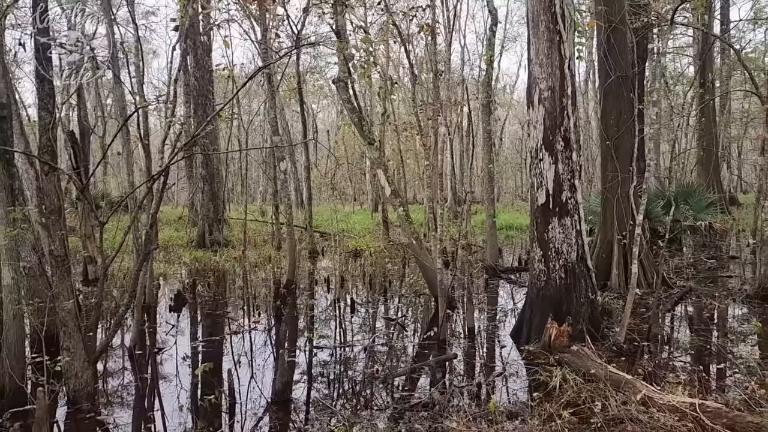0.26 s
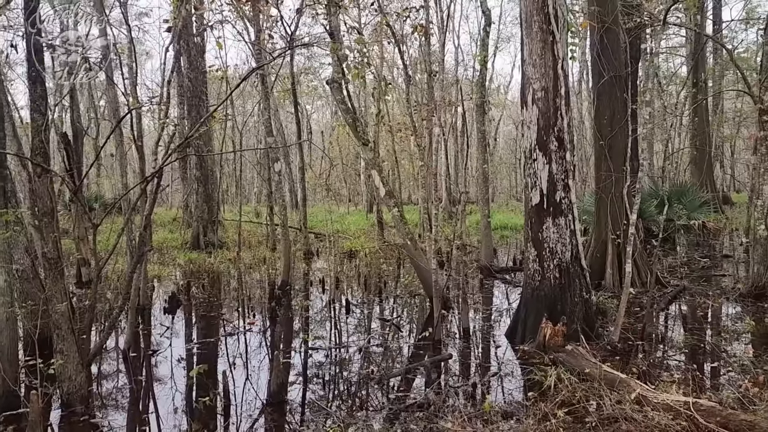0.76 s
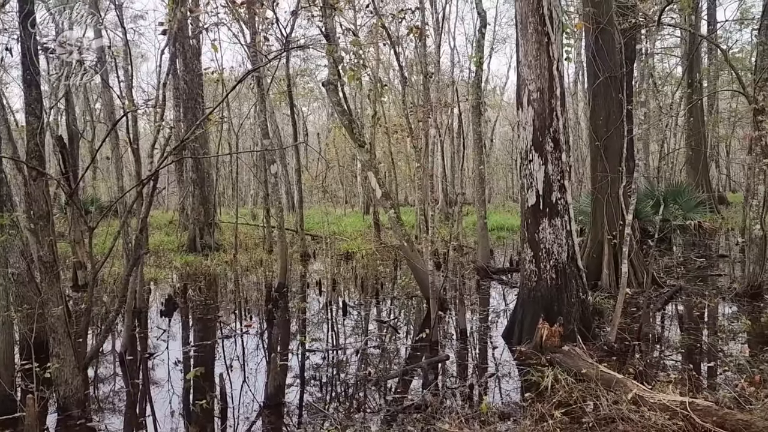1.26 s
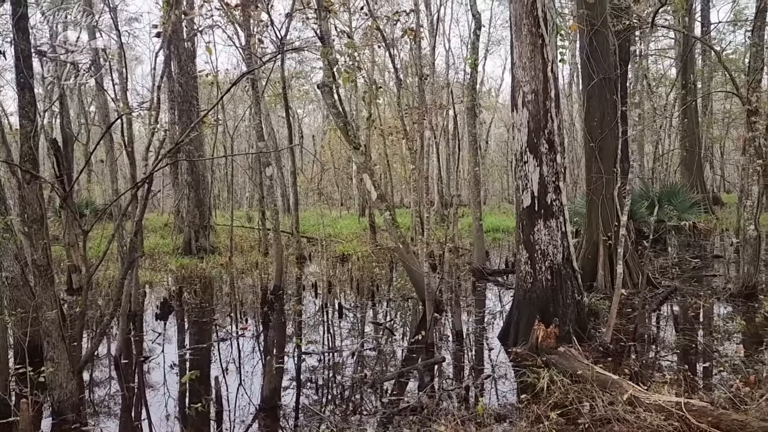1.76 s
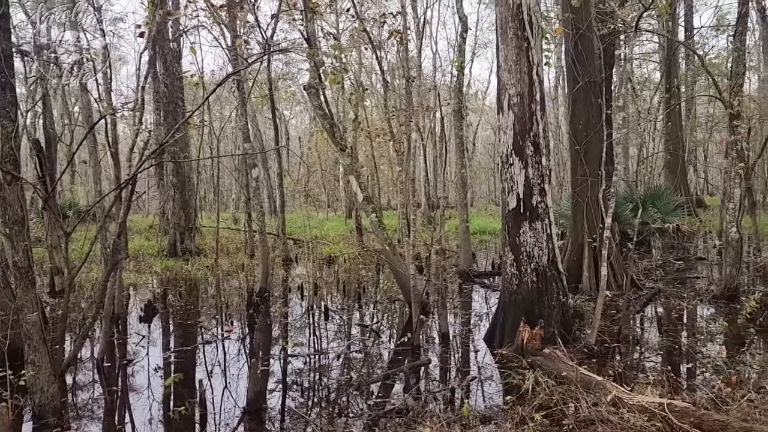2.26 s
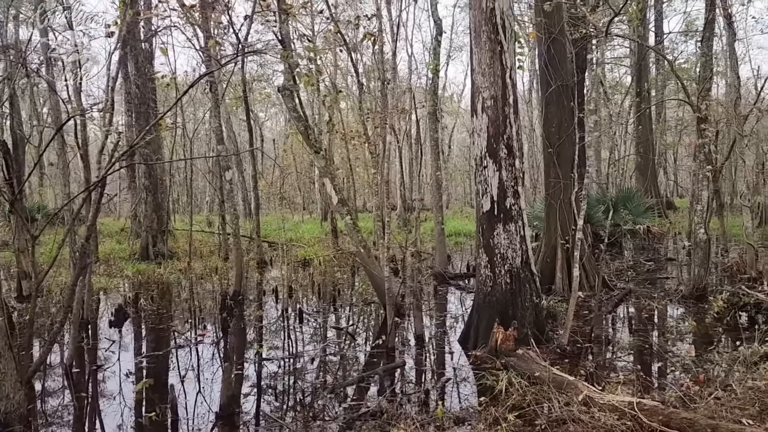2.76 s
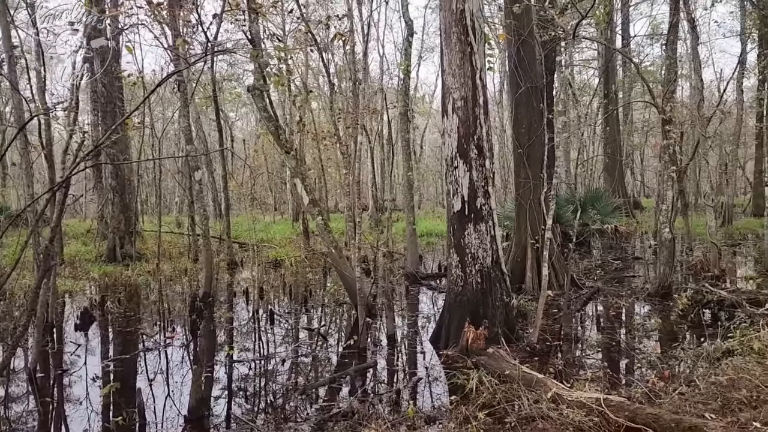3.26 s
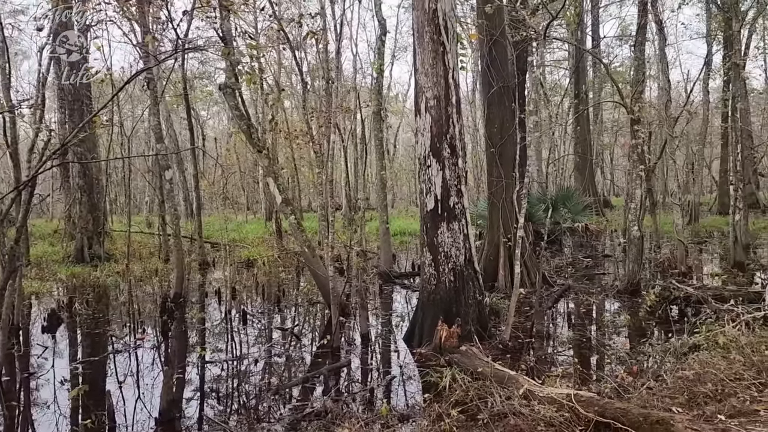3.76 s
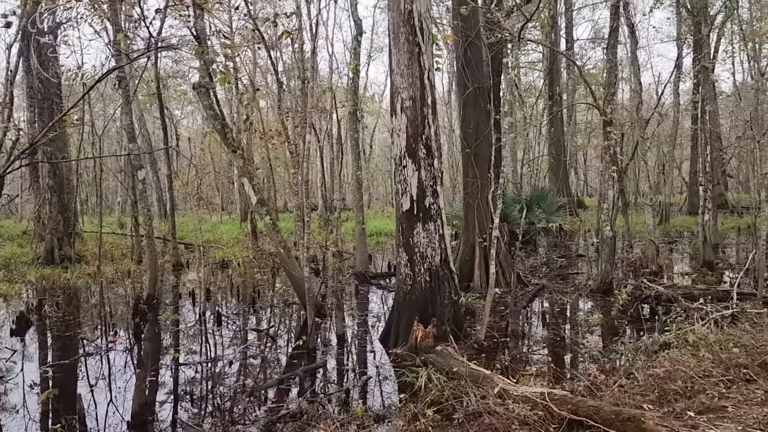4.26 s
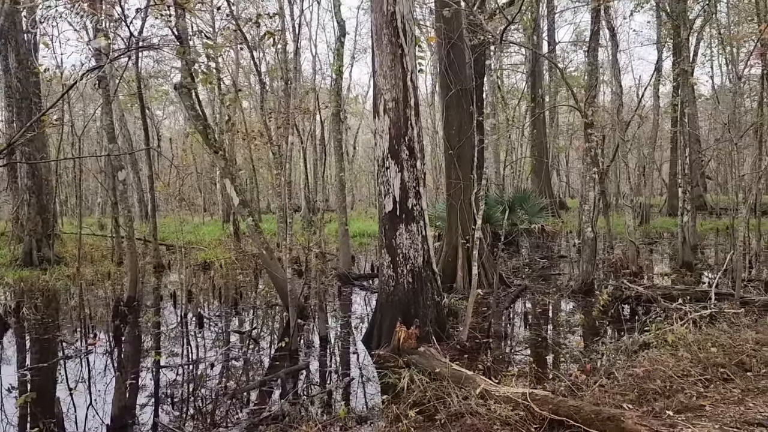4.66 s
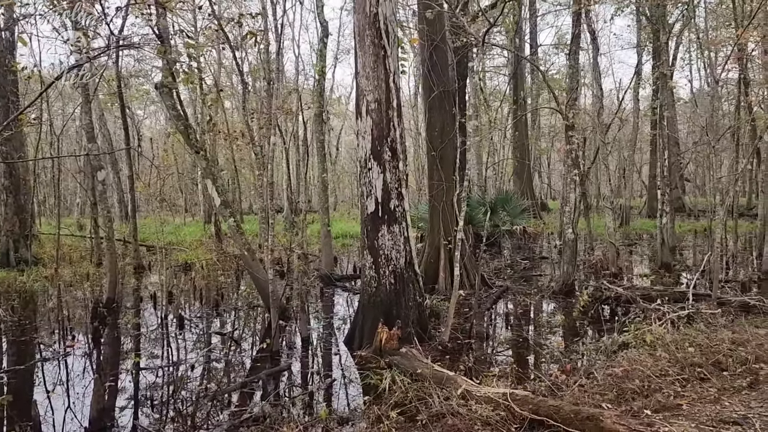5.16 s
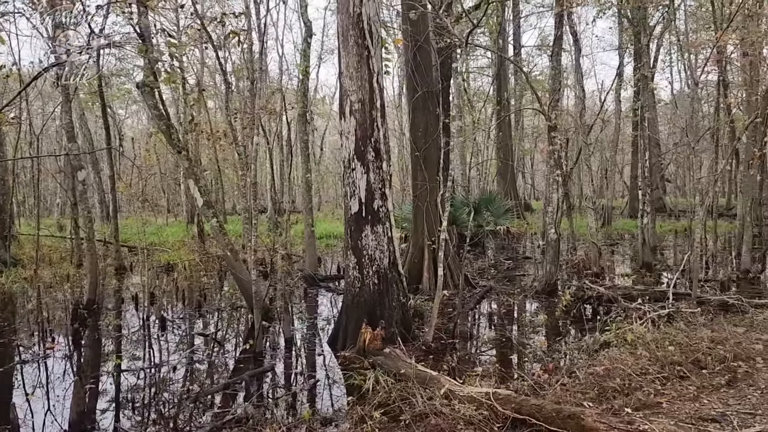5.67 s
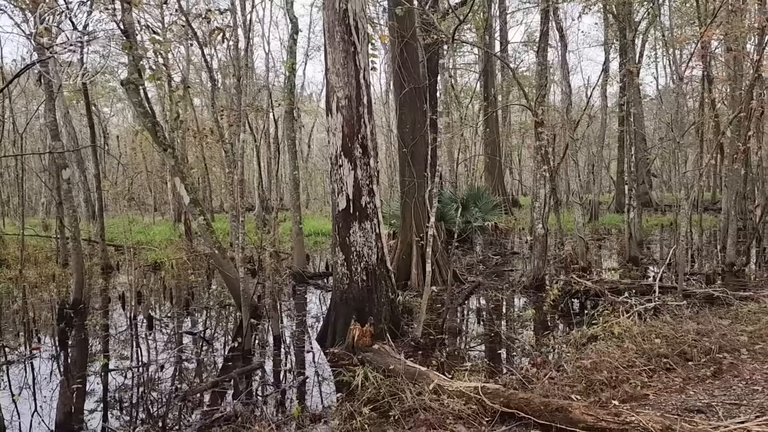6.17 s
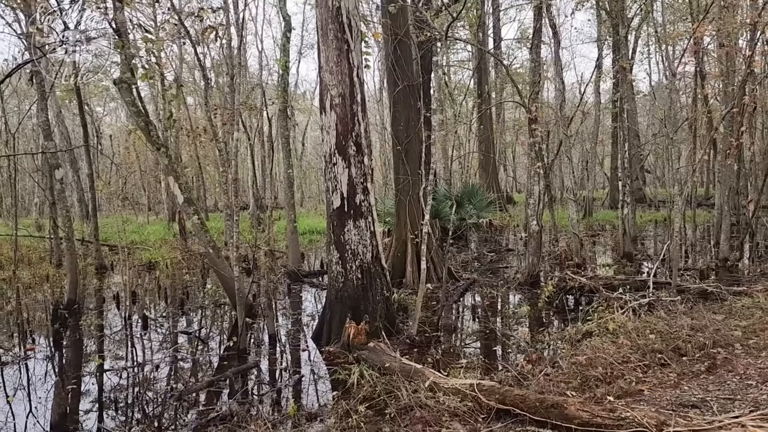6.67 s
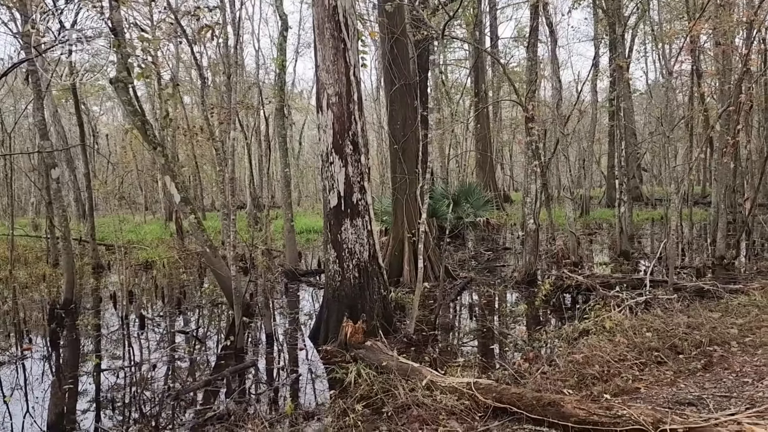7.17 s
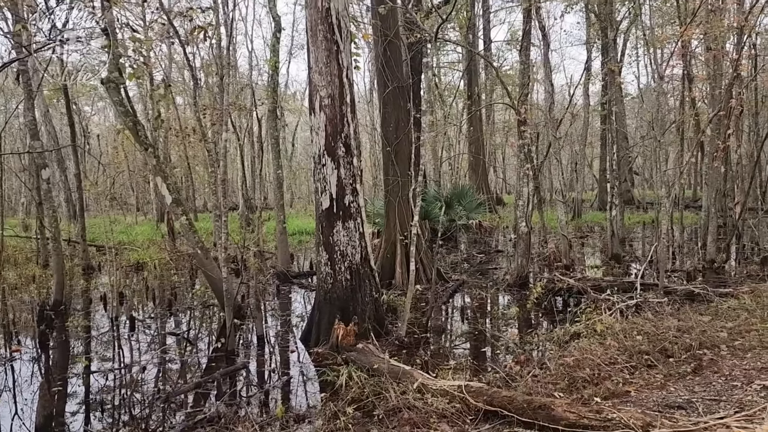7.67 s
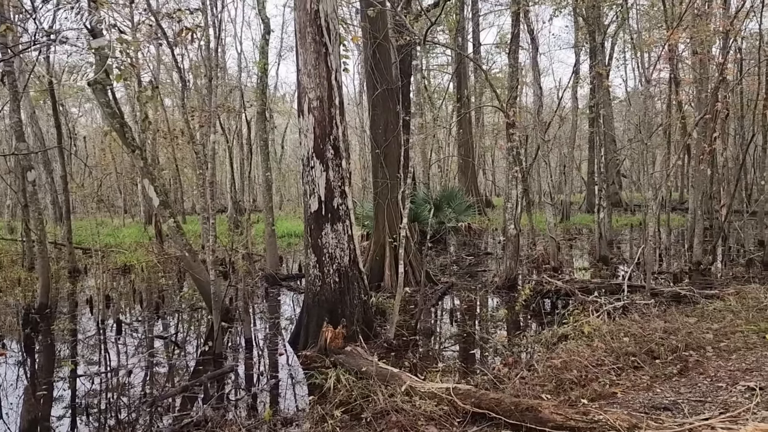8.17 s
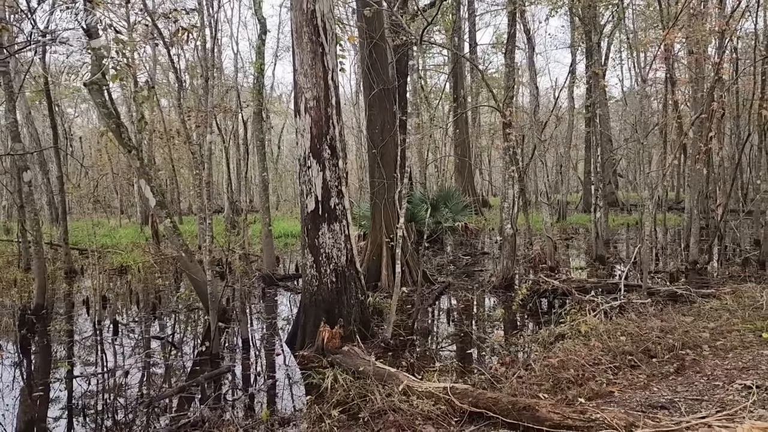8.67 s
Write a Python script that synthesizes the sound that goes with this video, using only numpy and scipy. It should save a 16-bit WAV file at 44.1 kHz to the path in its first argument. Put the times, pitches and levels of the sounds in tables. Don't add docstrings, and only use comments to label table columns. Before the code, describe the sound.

A still, wet woodland heard in wide stereo from a handheld microphone. Throughout, insects hold a thin, high, slightly shimmering drone, stronger on the right, over soft low traffic rumble. From 0 to 1 s birds sing a twice-repeated whistled phrase with low whistles and high chips, echoes ringing off trunks and water. From 1 to 4 s it is sparser: high chips, a bright one at 2.1, short harsh scolds, small rustles and a dull bump near 3.4. A faint distant engine hum grows from about 4 s. The whistled phrase returns four times from 4.2 to 5.6 s, followed by sharp chips and ticks to 6.5. Around 6.9 a broad airy wash sets in. From 7.1 a bird rattles in accelerating beats to the end; handling clicks, case knocks and thumps cluster at 7.2 to 7.5, lighter ones until 8.1. A loud piercing chip comes at 8.5.

```python
import sys
import numpy as np
from scipy import signal
from scipy.io import wavfile
from scipy.ndimage import uniform_filter1d

SR = 44100
rng = np.random.default_rng(int(sys.argv[2]) if len(sys.argv) > 2 else 0)


def voltage_ratio(level):
    return 10 ** (np.asarray(level, float) / 20)


def transcribe(u):
    v = np.clip(np.atleast_2d(u).T, -1, 1)
    q = np.round(v * 32767).astype(np.int16)
    wavfile.write(sys.argv[1], SR, q)


N = 393372


def evened(x):
    return x / np.sqrt(np.mean(x ** 2) + 1e-20)


def read(points, hz):
    f, value = np.transpose(points)
    return np.interp(np.log(hz + 1), np.log(f + 1), value)


def curve(rows, column=1):
    rows = np.array(rows)
    after = -140 if rows[-1, 0] < 8.8 else None
    return np.interp(np.arange(N) / SR, rows[:, 0], rows[:, column], left=-140, right=after)


def add(mix, s, sound, pan_db):
    for side, sign in zip(mix, (1, -1)):
        start = max(round(s * SR + sign * 0.2 * pan_db), 0)
        part = side[start:][:len(sound)]
        part += sound[:len(part)] * voltage_ratio(sign * pan_db / 2)


def band_pass(x, low_hz, high_hz):
    return signal.sosfilt(signal.butter(2, [low_hz, high_hz], "band", fs=SR, output="sos"), x)


def resonate(x, hz, width):
    turn = np.exp(2j * np.pi * hz * np.arange(x.shape[-1]) / SR)
    r = np.exp(-np.pi * width / SR)
    return 2 * (turn * signal.lfilter([1 - r], [1, -r], x / turn)).real


def resonate_twice(x, hz, width, second=1):
    return evened(resonate(resonate(x, hz, width), hz, second * width))


def air(spectrum, same, patchy_db, lean=((1, 0), (2, 0))):
    frames, hz = N // 512 + 5, np.fft.rfftfreq(2048, 1 / SR)
    a, b, c, d, patches = rng.standard_normal((frames, 1025, 5)).T
    patches = uniform_filter1d(patches, size=14, axis=0)
    patches = evened(uniform_filter1d(patches, size=8, axis=1))
    like = np.clip(read(same, hz), -1, 1)[:, None]
    left = a + 1j * b
    right = like * left + np.sqrt(1 - like ** 2) * (c + 1j * d)
    z = np.array([left, right]) * voltage_ratio(read(spectrum, hz)[:, None] + patchy_db * patches)
    z *= voltage_ratio(np.outer([0.5, -0.5], read(lean, hz)))[:, :, None]
    return evened(signal.istft(z, nperseg=2048, noverlap=1536)[1][:, :N])


# f/Hz, likeness (1 the same, below 0 opposed)
SAME = [(25, 0.87), (60, 1), (240, 0.86), (950, -0.19), (3770, 0.27), (15000, -0.2)]


def still_air():
    # f/Hz, level/dB
    rumble = [(18, -23), (35, -15), (55, 1.5), (71, 0.5), (110, -5.5), (165, -18), (270, -18.5), (400, -31),
              (520, -57.5)]
    # f/Hz, level/dB
    still = [(300, 2.5), (600, 6), (1600, 4.5), (2600, 5), (3400, 2), (6200, 8), (8000, 6), (8700, 2),
             (9300, 6), (10300, 4.5), (11000, -5.5), (15800, -9)]
    # f/Hz, left-right level/dB
    lean = [(150, 15), (380, 2.5), (950, -0.5), (2380, -4.5), (5980, -15.5), (8700, 9), (10200, 0.5),
            (11500, 11)]
    traffic = voltage_ratio(-45.5) * air(rumble, SAME, patchy_db=1.5)
    return traffic + voltage_ratio(-58.5) * air(still, SAME, patchy_db=1.45, lean=lean)


def moving_air():
    # f/Hz, level/dB
    wash = [(15, -34), (25, -8), (102, -10), (387, -19.5), (780, -15.5), (985, -23), (1440, -13),
            (1820, -23), (2160, -16.5), (2910, -27), (4000, -28), (5200, -34), (8800, -120)]
    # f/Hz, likeness
    same_wash = [(60, 0.95), (240, 0.86), (950, 0.52), (3770, 0.01), (15000, 0.11)]
    # t/s, hiss level/dB, gust level/dB
    wash_db = [
        (6.905, -51.5, -39),
        (7.6, -48.5, -39),
        (8.92, -49.5, -37.5),
    ]
    high_pass = signal.butter(2, 250, "high", fs=SR, output="sos")
    hiss = evened(signal.sosfilt(high_pass, air(wash, same_wash, patchy_db=1.5)))
    gust_spectrum = [(15, -25), (35, -0.5), (80, 2.5), (150, -10.5), (260, -21.0), (500, -51.0)]
    gusts = air(gust_spectrum, same_wash, patchy_db=1.5)
    return voltage_ratio(curve(wash_db)) * hiss + voltage_ratio(curve(wash_db, column=2)) * gusts


def engines():
    # t/s, f/Hz, level/dB
    hum = [(2.8, 134, -70), (3.9, 136, -55), (4.2, 137, -49.5), (6.3, 138.5, -44.5), (7.0, 138, -44),
           (7.15, 138, -56), (8.2, 138, -47), (8.4, 138, -62)]
    # t/s, f/Hz, level/dB
    high_hum = [(0.0, 260.7, -63), (2.48, 259.9, -64), (2.6, 252, -79)]
    out = 0
    for rows in (hum, high_hum):
        flutter = 1 + 0.12 * evened(uniform_filter1d(rng.standard_normal(N), size=3000))
        hz = np.maximum(curve(rows), 0)
        level = np.sqrt(2) * voltage_ratio(curve(rows, column=2))
        out = out + level * flutter * np.sin(2 * np.pi * np.cumsum(hz) / SR)
    return out


def insects(depth=0.2):
    # wing f/Hz, width/Hz, pulse rate/Hz, level/dB
    voices = [(4406, 400, 37, -3), (4735, 290, 53, 1), (4985, 305, 100, 1.5), (5200, 290, 67, -1),
              (5299, 157, 100, -1), (5440, 230, 73, -3.5)]
    # t/s, level/dB
    chorus_db = [(0.0, -41.5), (6.83, -41.5), (8.92, -40.5)]
    out = np.zeros((2, N))
    for hz, width, rate, db in voices:
        drift = evened(uniform_filter1d(rng.standard_normal((2, N)), size=6000))
        turns = np.cumsum(rate * (1 + 0.12 * drift), axis=1) / SR
        pulses = (1 + depth * np.cos(2 * np.pi * turns)) ** 2
        scrape = rng.standard_normal((2, N)) * pulses
        out += voltage_ratio(db) * resonate_twice(scrape, hz, width, second=1.08)
    side_db = np.array([[-1.5], [4.5]])
    return voltage_ratio(curve(chorus_db) + side_db) * evened(out)


def far_song():
    # t/s, low voices level/dB, high voices level/dB
    far_birds = [(0, -49, -45), (1.1, -53, -57.5), (2, -65, -78), (3, -86, -54), (3.9, -62.5, -70),
                 (4.9, -47, -59), (6.2, -54, -61), (7.2, -60.5, -54.5), (8.92, -50, -52)]
    low = air([(1700, -15), (2200, 0.5), (3000, -1), (3900, -2), (4400, -52)], SAME, patchy_db=3)
    high = air([(5600, -40), (6300, 0), (7500, 0), (8300, -4), (8700, -40)], SAME, patchy_db=4)
    return voltage_ratio(curve(far_birds)) * low + voltage_ratio(curve(far_birds, column=2)) * high


def knocks():
    # t/s, tick level/dB, thump level/dB, body level/dB, left-right level/dB
    hits = [(3.16, -94, -43, -81, 1), (3.419, -70, -36.5, -72, 1), (7.188, -54, -44.5, -57, 27.5),
            (7.2545, -47, -55, -49, 12), (7.266, -41, -44, -52, 21), (7.311, -34, -63, -34.5, -24),
            (7.3282, -28.5, -60, -27.5, -25), (7.435, -29, -52.5, -47, -15),
            (7.4457, -20.5, -29.5, -31.5, -16.5), (7.478, -21.5, -51, -39, -10.5),
            (7.719, -40, -43.5, -50, 13.5), (7.756, -29.5, -58, -59, 14), (8.011, -38, -37.5, -44.5, 20),
            (8.056, -41, -43.5, -55, 15)]
    # f/Hz, level/dB, time to fade by 60 dB/s
    case = ((312, -15.5, 0.052), (512, -8.5, 0.035), (820, 4.5, 0.0046), (1710, -3.0, 0.006))
    out, t = np.zeros((2, N)), np.arange(2600) / SR
    for s, tick_db, thump_db, body_db, pan_db in hits:
        grit, pitch = rng.standard_normal(len(t)), rng.uniform(0.84, 1.195)
        tick = voltage_ratio(tick_db - 60 * t / 0.0041) * band_pass(grit, 2500, 10500)
        body = 0
        for hz, db, t60 in case:
            body = body + voltage_ratio(db - 60 * t / t60) * np.sin(2 * np.pi * hz * pitch * t - 0.9)
        body = body * (1 - np.exp(-t / 0.000089))
        sag_hz = 75 + 130 * np.exp(-t / 0.006)
        thump = np.sin(2 * np.pi * np.cumsum(sag_hz) / SR - 1.5)
        thump = thump * voltage_ratio(-60 * t / 0.098) * (1 - np.exp(-t / 0.0017))
        add(out, s, tick - voltage_ratio(body_db + 5.5) * body + voltage_ratio(thump_db + 6.0) * thump, pan_db)
    return out


def rustles():
    # t/s, length/s, centre f/Hz,
    # width/Hz, level/dB
    puffs = [(0.228, .04, 2000, 1700, -58), (0.85, 0.12, 3200, 2400, -49.5),
             (2.967, 0.042, 410, 151, -53.5), (3.229, 0.069, 3300, 1600, -47),
             (3.255, 0.056, 2400, 2200, -44), (3.255, 0.06, 6800, 1800, -49.5),
             (4.067, 0.043, 3200, 1510, -56.5), (4.305, 0.075, 800, 3300, -50),
             (4.319, 0.039, 210, 72, -41.5), (4.611, 0.1, 393, 89, -56.5), (4.925, 0.036, 430, 440, -52.5),
             (5.33, 0.27, 1280, 500, -60.5), (5.35, .06, 1550, 150, -53.5), (5.4, 0.055, 1660, 210, -57),
             (5.801, 0.056, 1760, 900, -56), (3.87, .11, 1250, 200, -62), (4.02, .11, 600, 150, -65),
             (6.54, .12, 1220, 50, -65), (4.52, .18, 1450, 300, -64), (3.3, .1, 2800, 1200, -59),
             (3.14, .05, 200, 50, -47), (3.8, 0.039, 520, 250, -62), (5.23, 0.038, 730, 500, -61.5),
             (5.79, 0.059, 460, 140, -59), (6.08, 0.055, 450, 160, -61), (4.571, 0.032, 3100, 1200, -50),
             (2.15, .1, 7500, 600, -47), (2.2, .17, 7600, 700, -53), (3.72, 0.13, 7600, 800, -58),
             (1.747, 0.11, 440, 150, -65.5), (6.071, 0.076, 1600, 1300, -61),
             (6.966, 0.058, 7000, 4000, -52), (7.261, 0.013, 600, 420, -37.5),
             (7.305, 0.04, 1200, 1600, -40), (7.325, 0.06, 5900, 4500, -44), (7.256, 0.02, 6500, 3300, -43),
             (7.425, 0.047, 7600, 3700, -45), (7.517, 0.049, 7800, 3000, -53.5)]
    # t/s, length/s, centre f/Hz,
    # width/Hz, level/dB
    swishes = [(6.94, .11, 9200, 7600, -62), (7.17, .07, 10000, 6000, -62), (7.29, .1, 11000, 8400, -52.5),
               (7.41, .075, 11000, 7000, -50), (7.019, .012, 11000, 6000, -60),
               (7.214, .012, 10000, 6000, -60), (8.248, .016, 10000, 5400, -60.5),
               (4.1, .06, 11600, 400, -64), (7.3, .05, 500, 300, -45), (7.44, .05, 640, 570, -46),
               (.87, 0.043, 7500, 2000, -55), (4.27, 0.085, 174, 30, -53), (5.0, 0.13, 7500, 600, -54),
               (5.78, .14, 7400, 600, -52), (6.12, .11, 6300, 600, -48), (5.29, .08, 1310, 200, -58),
               (6.5, .09, 7300, 500, -50)]
    out = np.zeros((2, N))
    for s, length, hz, width, db in puffs:
        size = round(length * SR)
        for side in out:
            crackle = uniform_filter1d(rng.exponential(1, size) ** 3, size=110)
            grains = rng.standard_normal(size) * crackle
            puff = resonate_twice(grains, hz, width) * np.hanning(size)
            side[round(s * SR):][:size] += voltage_ratio(db) * puff
    for s, length, hz, width, db in swishes:
        size = round(length * SR)
        hiss = rng.standard_normal((2, size)) * voltage_ratio(np.array([[-3], [3]]))
        swish = resonate_twice(hiss, hz, width) * np.hanning(size)
        out[:, round(s * SR):][:, :size] += voltage_ratio(db) * swish
    return out


def note(length, from_hz, to_hz, db, settle=None, arch_hz=0, fade_db=0, taper=0.5, rough=0, grain=45):
    u = np.linspace(0, 1, round(length * SR))
    hz = from_hz + (to_hz - from_hz) * u + arch_hz * np.sin(np.pi * u)
    level = voltage_ratio(db - fade_db * u)
    if settle:
        high, rest = to_hz > 5000, np.exp(-u * length / settle)
        hz = to_hz - (to_hz - from_hz) * rest
        hz = hz - 0.142 * to_hz * high * np.exp(-u * length / 0.00233)
        level = level * (1.17 - rest) ** (0.5 + 0.47 * high)
    flecks = np.convolve(rng.standard_normal(len(u)), np.hanning(round(grain)), "same")[:len(u)]
    level = level * (1 - rough + rough * evened(flecks)) * signal.windows.tukey(len(u), taper)
    return level * np.sin(2 * np.pi * np.cumsum(hz) / SR)


def chip(length, hz, db, share, settle):
    high = hz > 5000
    rough = min(0.15 + 6.6 * length, 0.45) * high
    return note(length, share * hz, hz, db + 5.5, settle=min(settle, length / 2.66),
                fade_db=2.7 * high, taper=0.16, rough=rough, grain=300)


def chips():
    # t/s, length/s, top f/Hz, level/dB, left-right level/dB
    flicks = [(.334, 0.03, 8900, -46.5, 8), (.526, 0.026, 8430, -47, 1), (1.65, 0.013, 7500, -46, -11),
              (1.727, 0.0088, 7600, -45, -18), (1.796, .012, 7000, -43, -9), (1.915, 0.022, 6530, -36, -14),
              (1.94, 0.021, 8100, -42, 8), (2.14, 0.013, 7930, -27.5, 7.5),
              (2.185, 0.023, 6620, -37, -12.5), (2.679, .054, 7630, -48, -9), (2.792, .04, 7700, -52, -3),
              (3.698, 0.028, 8300, -42, -4.5), (4.849, 0.11, 8170, -41, -3), (5, 0.11, 7900, -41, -3),
              (5.155, 0.028, 7900, -28.5, -11), (5.309, 0.042, 7330, -38.5, -7),
              (5.756, 0.11, 7760, -32, -7.5), (5.9, 0.044, 7060, -37.5, -12),
              (6.12, 0.018, 7970, -35, -3.5), (6.492, 0.023, 7810, -25, -12),
              (7.184, 0.025, 7900, -38.5, -4), (7.56, 0.021, 8000, -37, -7.5), (8.483, 0.024, 8010, -21, 1),
              (5.605, .03, 7800, -43, -4.5)]
    # t/s, length/s, top f/Hz, level/dB
    seets = [(.077, 0.048, 7430, -34.5), (0.177, .046, 6850, -40), (2.6, 0.042, 7750, -53),
             (2.7, .04, 8430, -50), (2.817, .17, 8000, -52), (3.43, 0.064, 7400, -53.5),
             (8.6, 0.051, 8300, -52), (5.615, 0.11, 7900, -40), (5.989, 0.05, 6630, -37.5),
             (8.755, 0.063, 7880, -43.5), (8.382, 0.071, 8230, -44.5), (8.567, 0.065, 7700, -58)]
    # t/s, length/s, top f/Hz, level/dB
    risers = [(.522, 0.028, 4100, -47), (1.981, 0.019, 3930, -39.5), (2.258, 0.085, 2790, -51.5),
              (6.2, 0.026, 3910, -39.5), (6.365, .052, 4100, -49), (6.48, 0.0766, 2806, -48),
              (6.235, .07, 4070, -51)]
    out = np.zeros((2, N))
    for s, length, hz, db, pan_db in flicks:
        add(out, s, chip(length, hz, db, 0.8, 0.0092), pan_db)
    for s, length, hz, db in seets:
        add(out, s, chip(length, hz, db, 0.9, 0.01173), -2.5)
    for s, length, hz, db in risers:
        add(out, s, chip(length, hz, db, 0.87, 0.03), -12.5)
    return out


def calls():
    # t/s, length/s, f/Hz, level/dB, left-right
    # level/dB
    held = [(0, 0.012, 8120, -31.5, -1), (0.261, 0.03, 6500, -33.5, -16), (.349, 0.018, 6470, -30, -12.5),
            (.79, .19, 4180, -39.5, -6.5), (.2, .06, 6900, -44, -1), (1.28, 0.2, 3085, -50.5, -10),
            (1.34, .08, 2100, -55, -5.5), (1.5, 0.13, 3080, -53, -8), (1.7, .12, 3050, -52, -7),
            (6.6, .16, 3090, -53, -9), (6.8, 0.22, 3140, -56, -8), (1.2, 0.32, 6450, -57, -8),
            (1.56, 0.045, 7500, -41, -5), (2.52, .08, 7770, -46, -2.5), (2.54, 0.062, 7400, -48, -3),
            (2.345, .11, 8250, -47, -3), (3.49, 0.076, 7930, -48, -2), (3.56, .04, 7800, -46, -2.5),
            (6.8, .1, 8150, -50, -1), (6.81, .02, 7850, -39, -2), (2.66, .18, 6450, -54, -9),
            (1.948, 0.0086, 3730, -40, -18), (2.128, 0.011, 3700, -35, -13), (2.95, .018, 4100, -41.5, -26),
            (6.06, 0.069, 6510, -34.5, -13.5), (8.824, 0.025, 3870, -37.5, -24)]
    # t/s, start f/Hz, level/dB
    scolds = [(1.731, 2950, -43.5), (2.7, 3150, -49), (2.966, 3210, -48), (3.183, 2900, -47),
              (3.265, 3400, -40), (3.245, 4400, -46), (3.385, 2855, -46), (4.12, 3030, -45.5),
              (5.912, 3110, -44)]
    # t/s, centre f/Hz, level/dB, swing (plus rises, minus falls)
    ticks = [(1.363, 7370, -51, -0.88), (.575, 7750, -50, 1), (.645, 8000, -50, -.5), (1.9, 3000, -48, 1),
             (2.03, 6600, -47.5, 1), (2.5, 7800, -51, 1), (2.535, 8600, -53, .4), (3.06, 7400, -51, -.3),
             (1.854, 3670, -41.5, -1.2), (2.219, 4020, -45.5, -1), (3.002, 3600, -40.5, -1.2),
             (3.015, 3400, -44, -1), (4.983, 5630, -40.5, 0.14), (5.868, 6800, -45, 1.8),
             (5.945, 7200, -39, 1.3), (6.07, 5950, -43, 1), (6.14, 6300, -31.5, -1.16),
             (6.275, 6943, -43, -1.2), (6.414, 6350, -32.5, -0.57), (8.42, 3270, -37, -0.37),
             (1.59, 6200, -47, .5), (2.06, 6760, -47, 1), (5.15, 4300, -45, 1), (5.59, 4200, -41, 1)]
    out = np.zeros((2, N))
    for s, length, hz, db, pan_db in held:
        add(out, s, note(length, hz, hz, db - 5, taper=0.35, rough=0.22, grain=600), pan_db)
    for s, hz, db in scolds:
        add(out, s, note(0.023, hz, 0.81 * hz, db + 3.0, taper=0.44, rough=0.57, grain=50), -15.5)
    for s, hz, db, way in ticks:
        swing = 0.055 * way
        tick = note(0.014, hz * (1 - swing), hz * (1 + swing), db + 0.5, taper=0.39, rough=0.4, grain=54)
        add(out, s, tick, -22)
    return out


def phrases():
    # t/s of the arched note, then level/dB of arch, middle note, slide and pick-up
    sung = [(0.207, -32, -33, -41, -60), (.648, -35.5, -36.5, -44, -49), (4.177, -41, -44, -49, -66),
            (4.606, -35, -39.5, -49, -53), (5.032, -33, -34, -46, -52), (5.471, -33, -37, -45, -50)]
    # delay/s, length/s, start f/Hz, end f/Hz, left-right level/dB
    parts = [
        (-.006, .057, 3520, 3320, -6.5),
        (.064, 0.025, 3000, 3100, 2),
        (0.14, 0.024, 3100, 2150, 1),
        (-0.14, 0.028, 2000, 2400, 0),
    ]
    out = np.zeros((2, N))
    for s, *levels in sung:
        for (delay, length, a, b, pan_db), db in zip(parts, levels):
            arch_hz = 374 * (a > 3300)
            add(out, s + delay, note(length, a, b, db, arch_hz=arch_hz, taper=0.45, rough=0.22, grain=300), pan_db)
    return out


def whistles():
    # t/s, length/s, level/dB
    syllables = [(0.032, 0.048, -53), (0.077, 0.1, -42), (0.193, 0.035, -51), (0.233, 0.068, -48),
                 (.315, 0.048, -45), (0.514, 0.09, -43), (0.606, 0.05, -45.5), (0.667, 0.16, -47),
                 (4.492, 0.066, -44), (4.575, 0.1, -43.5), (4.695, 0.061, -51), (4.902, 0.028, -57),
                 (4.926, 0.097, -41), (5.047, 0.052, -42.5), (5.111, .065, -49), (5.34, 0.11, -42),
                 (5.464, 0.067, -41), (5.537, 0.094, -49)]
    out = np.zeros((2, N))
    for s, length, db in syllables:
        sound = note(length, 2450, 2440, db + 0.8, fade_db=2.5, taper=0.28, rough=0.12, grain=800)
        add(out, s, sound, -5)
    return out


def rattle():
    # length/s, start f/Hz, end f/Hz, level/dB, left-right level/dB
    beat = [
        (.016, 2400, 1970, -35, -8),
        (.02, 7420, 7280, -46, -3),
        (.014, 3950, 3450, -45, -5),
        (.012, 2700, 2500, -48, -6),
    ]
    delays = [-.0055, -.012, -.011, -.013]
    out, k = np.zeros((2, N)), np.arange(26)
    drag = 0.2927 * (1 - np.exp(-k / 9.47))
    beats = 7.1239 + 0.05845 * k + drag - 0.014 * (k == 0)
    for s, drift in zip(beats, rng.uniform(0.98, 1.02, len(k))):
        for delay, (length, a, b, db, pan_db) in zip(delays, beat):
            shy_db = 30 * max(7.8 - s, 0) * (b > 2300)
            sound = note(length, a * drift, b * drift, db - shy_db + 6.0, taper=0.75, rough=0.21)
            add(out, s + delay, sound, pan_db)
    return out


def trees(x):
    # f/Hz, time to fade by 60 dB/s
    ring = [(1000, 0.21), (2500, 0.97), (3800, 1), (6000, 1), (8000, 0.53)]
    taps = np.zeros((2, SR))
    at = np.arange(300, SR - 20, 20) + rng.integers(0, 20, (2, (SR - 301) // 20))
    np.put_along_axis(taps, at, rng.choice([-1., 1.], at.shape), 1)
    hz, t, z = signal.stft(taps, SR, nperseg=256)
    fade = voltage_ratio(-60 * t / read(ring, hz)[:, None]) + 0.4 * voltage_ratio(-60 * t / 0.05)
    tail = signal.istft(z * fade, SR, nperseg=256)[1]
    leaves = evened(np.convolve(rng.standard_normal(N), np.hanning(300), "same"))
    blurred = x.mean(0) * (np.sqrt(0.5) + np.sqrt(0.5) * leaves)
    return signal.fftconvolve(blurred[None], tail / np.linalg.norm(tail[0]), axes=1)[:, :N]


def scene():
    # t/s, level/dB
    dip = [(8.87, -8), (8.882, -16), (8.905, -40), (8.915, -6.5)]
    song, beats, low = chips() + calls() + phrases(), rattle(), whistles()
    echoes = voltage_ratio(-3.5) * trees(song + voltage_ratio(-1.5) * beats + voltage_ratio(-1) * low)
    treble = song + beats + low + echoes + far_song() + insects()
    s, db = np.transpose(dip)
    treble = treble * voltage_ratio(np.interp(np.arange(N) / SR, s, db))
    return still_air() + moving_air() + engines() + knocks() + rustles() + treble


def thin_treble(x):
    # t/s, left share (0-1), right share (0-1)
    starved = [(2.3, 0.04, .93), (2.6, .04, .75), (4.5, .04, .75), (4.75, 0.75, .98), (6.7, 0.8, .95),
               (6.9, 0.05, .9), (7.5, .05, .95), (7.65, 0.8, .99)]
    hz, t, z = signal.stft(x, SR, nperseg=1024)
    luck = np.repeat(rng.random((len(t) // 3 + 1, 2)), 3, axis=0)[:len(t)].T
    s, left, right = np.transpose(starved)
    share = np.array([np.interp(t, s, left), np.interp(t, s, right)])
    deep_hz, top_hz = np.array([[12900], [10600]]), np.array([[15000], [12900]])
    deep_share = share * np.array([[0.55], [0.6]])
    edge_hz = np.where(luck < deep_share, deep_hz, np.where(luck < share, top_hz, 15750))
    burst = (abs(z[:, hz > 13000]) ** 2).mean(1)
    edge_hz[burst > 12 * np.median(burst, axis=1)[:, None]] = 15900
    gain = np.where(hz[:, None] > edge_hz[:, None], 0.01, 1)
    return signal.istft(z * gain, SR, nperseg=1024)[1][:, :N]


def top_cut(x):
    return signal.sosfilt(signal.butter(12, 15900, fs=SR, output="sos"), x)


def record(dry):
    mix = np.tanh(2 * thin_treble(dry)) / 2
    return top_cut(mix)


dry = scene()
out = record(dry)
transcribe(out)
```